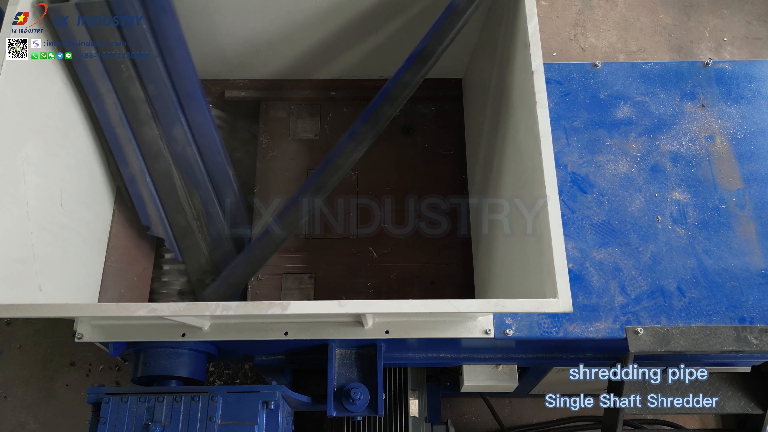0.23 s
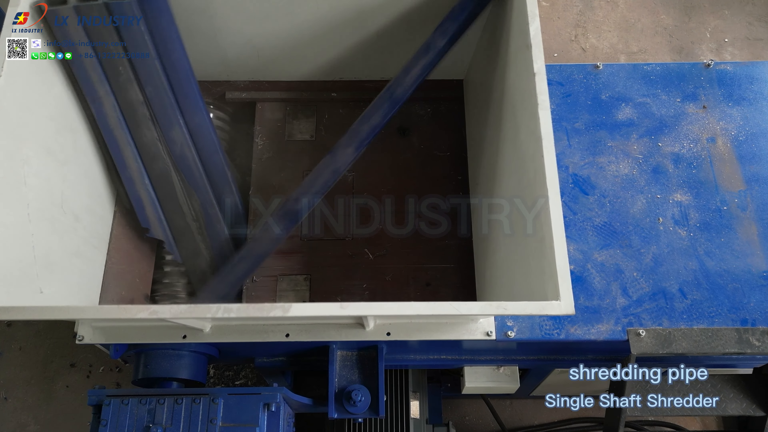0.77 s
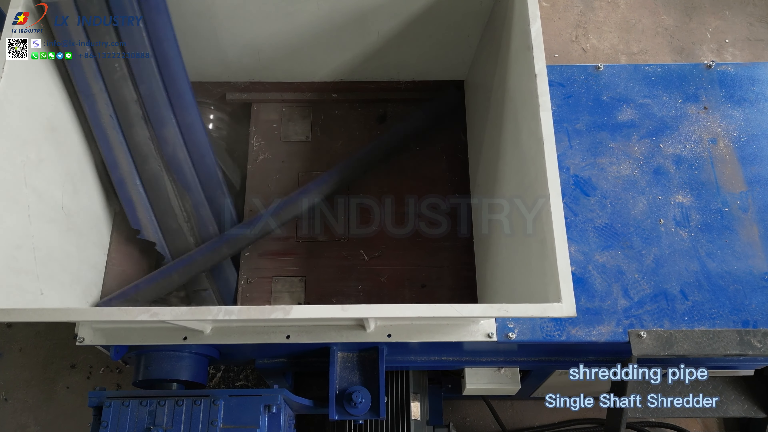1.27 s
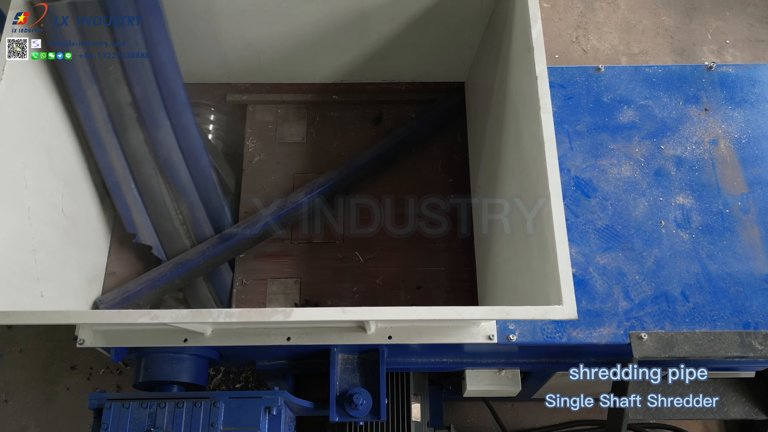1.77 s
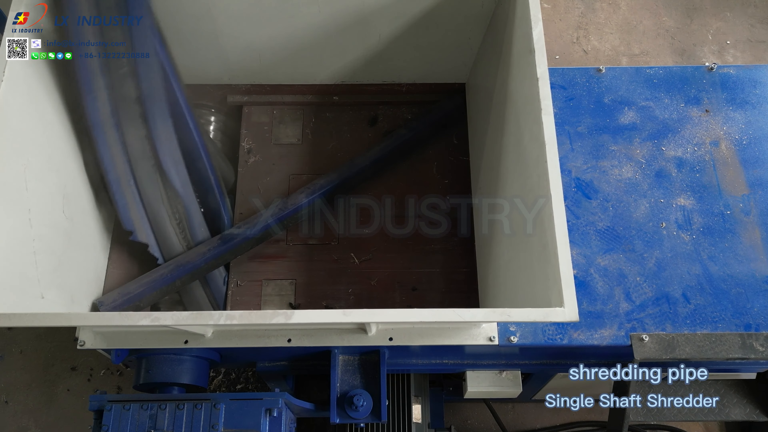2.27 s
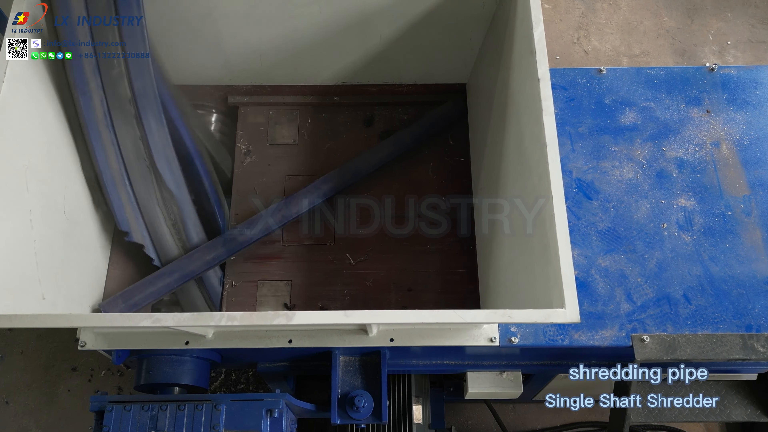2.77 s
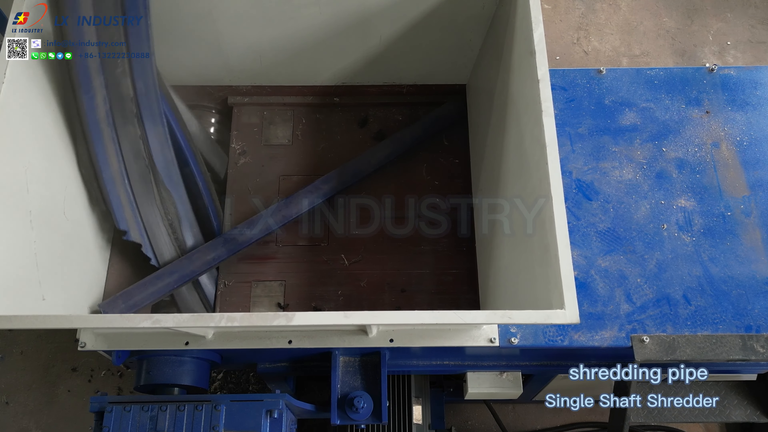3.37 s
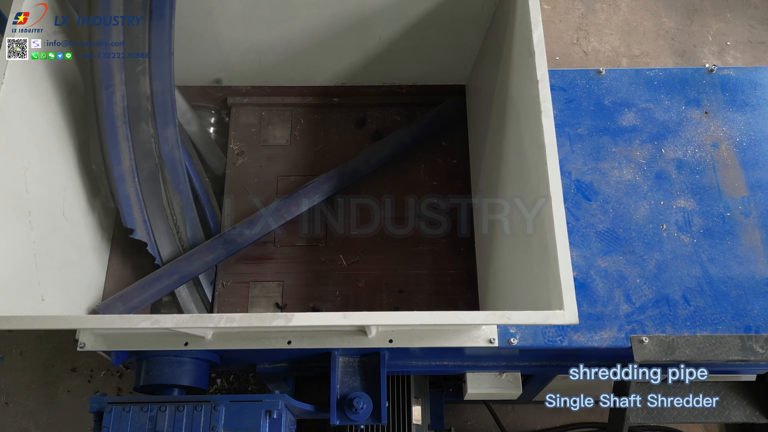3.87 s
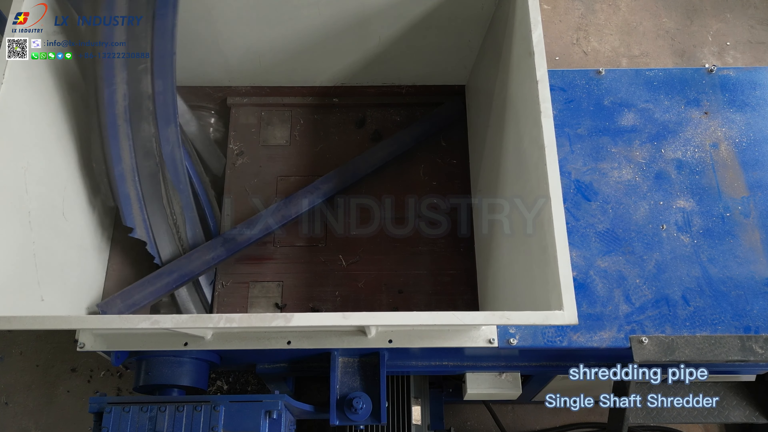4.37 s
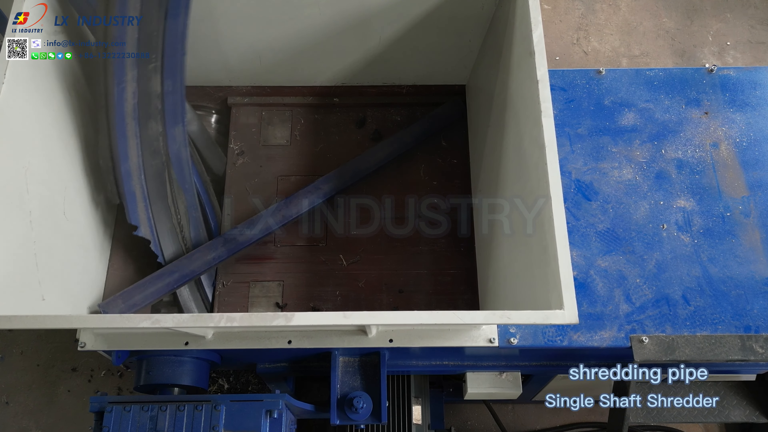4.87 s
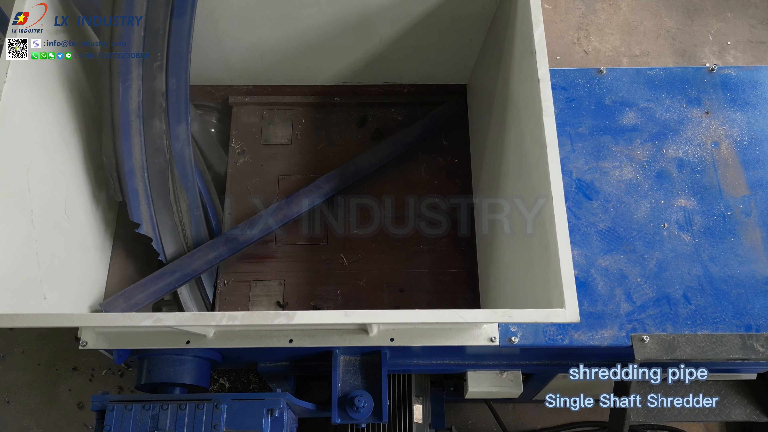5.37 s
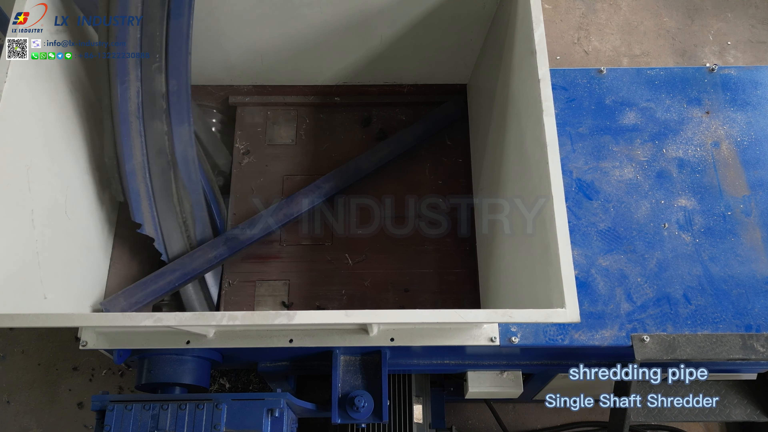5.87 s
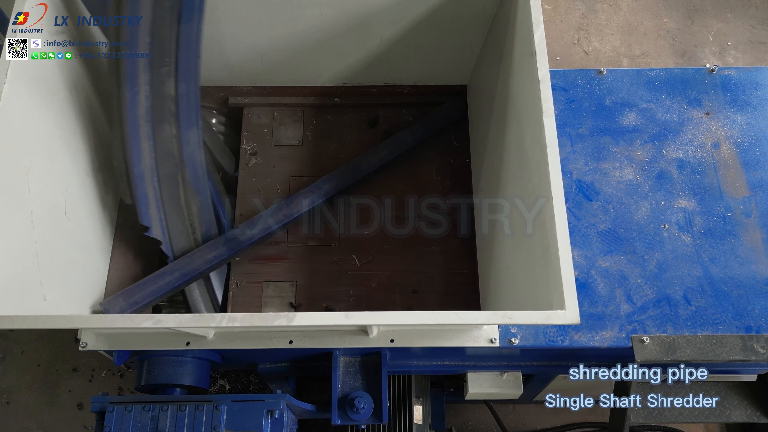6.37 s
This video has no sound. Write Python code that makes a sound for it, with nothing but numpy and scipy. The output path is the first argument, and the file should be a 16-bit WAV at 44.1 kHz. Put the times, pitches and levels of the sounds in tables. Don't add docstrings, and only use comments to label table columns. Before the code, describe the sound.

From 0 s, loud, dense grinding and crunching: shredder knives bite plastic pipe about every 0.17 s, each bite coming fast and dying slowly. Tearing cracks shake the steel hopper into a harsh midrange metallic roar, with snaps, ringing chips, hissing fine spray and low frame rumble. Hollow breathy pipe resonance wavers underneath. From about 2.2 s a pitched honk begins to form; between 3.2 and 4.9 s it is a firm, fluttering tone near 370 Hz, pulsing with every bite while the crunch eases slightly. At about 5 s cutting stops and the level drops sharply. A low steady motor and gear drone shows through, with faint rhythmic scraping, dull knocks of tumbling scraps and tiny clear pings on steel from 5.2 s. Near 6.35-6.55 s louder clustered knocks and a soft low thud with a bounce land before the end at 6.6 s. Close, wide stereo, little audible room.

```python
import sys
import numpy as np
from scipy import signal
from scipy.fft import rfft, irfft, next_fast_len
from scipy.io import wavfile
from scipy.ndimage import uniform_filter1d, map_coordinates

SR = 44100
rng = np.random.default_rng(int(sys.argv[2]) if len(sys.argv) > 2 else 0)


def voltage_ratio(level):
    return 10 ** (np.asarray(level, float) / 20)


def generate_wav(sig):
    pcm = np.round(np.clip(np.atleast_2d(sig).T, -1, 1) * 32767).astype(np.int16)
    wavfile.write(sys.argv[1], SR, pcm)


N = 291501

# (frequency [Hz], density [dB per Hz])
HOPPER = [(120, -0.5), (280, 3.5), (450, 4), (560, 1), (700, 0.5), (1050, 1), (1500, -2.5), (2000, -7),
          (2500, -6.5), (3400, -16), (6000, -29)]
# (frequency [Hz], density [dB per Hz])
SPRAY = [(1500, -2), (2600, 2.5), (3900, -3), (5300, 0), (7000, -6), (9500, -8.5), (11300, -11),
         (12500, -16), (13800, -20), (15000, -13.5), (15400, -19), (16000, -24)]
# (time [s], hold [0-1])
LOCK = [
    (0, .1),
    (2.0, .2),
    (2.3, .55),
    (3.05, .55),
    (3.2, .84),
    (4.85, .84),
    (5.05, .4),
    (5.3, .1),
    (6.61, .1),
]
# (time [s], swell [dB], short pipe re load [dB], long pipe re load [dB])
BITES = [(0.085, -3, -8, -2), (0.28, 3, -5.5, -8), (0.455, 2, -4, -4), (0.625, 3.5, -12, -1),
         (0.8, 2.5, -6, -3), (0.98, 2.5, -18, -8.5), (1.165, 4, -17, -6.5), (1.34, 1, -6.5, -9.5),
         (1.51, 2, -11, -3), (1.69, -1, -5.5, -4), (1.85, .1, -11, -2.5), (2.04, 1.5, -4.5, -3),
         (2.2, 3.5, -3, -2), (2.38, -0.5, 0, -3), (2.56, .5, -1.5, -6), (2.73, 1, -3, -5.5),
         (2.9, 1.5, -0.5, -8.5), (3.08, -1, 1, -3), (3.244, 0.5, 7, -6), (3.42, 2, 9, -10.5),
         (3.601, -0.5, 6.5, -0.5), (3.775, 2.5, 8, -10), (3.955, 0.5, 7, -9), (4.125, 1.5, 7.5, -13),
         (4.305, 1, 4.5, -10), (4.48, 1, 2.5, -13), (4.66, 2.5, 0, -10), (4.835, 0, 4, -5.5),
         (4.98, 3, -4, -9)]
DIRECT = np.array([[1], [0]])


def knives():
    # (frequency [Hz], density [dB per Hz])
    frame_colour = [(25, -64), (45, -11.5), (72, 2.5), (115, -9), (140, -3), (175, -12), (300, -13)]
    # (frequency [Hz], width [Hz], level [dB])
    long_pipe = [(236.7, 23, -6.5), (485.4, 29, -16.5), (694, 240, -18)]
    bite_db, spray_db, frame_db, short_db, long_db = rotor()
    cracks = fractures(rate_hz=200, spread_db=0.5, t60_s=0.035)
    grit = fractures(rate_hz=700, spread_db=2, t60_s=0.014)
    surge = wobble(18)

    walls_db = bite_db - 0.81 + 0.32 * surge + 0.34 * wobble(24.96)
    walls = voltage_ratio(walls_db) * patchy(driven(cracks, 11, sheet_steel), depth_db=0.5)
    ringing = voltage_ratio(bite_db - 11) * chips(count=3500, cycles=11)
    ticks = voltage_ratio(bite_db - 11) * snaps(rate_hz=80)

    spray_db = spray_db + 2 + 0.24 * surge + 0.7 * wobble(55)
    spray = voltage_ratio(spray_db) * patchy(driven(cracks + grit, 14, colour(SPRAY)), depth_db=1.57)
    frame = voltage_ratio(frame_db + 0.8 + 0.11 * wobble(4.3)) * driven(cracks, 8.7, colour(frame_colour))
    short = voltage_ratio(short_db + 0.75) * honk(cracks)
    long = voltage_ratio(long_db + 1) * driven(cracks, 1.1, resonances(long_pipe))
    return walls + ringing + ticks + spray + frame + short + long


def rotor():
    # (time [s], cutting load [dB], frame shake re load [dB], fine chips re load [dB])
    load = [(0.0, -20.5, -3, -9.5), (0.55, -19, -11.5, -9.5), (1.2, -19, -10, -9.5),
            (1.36, -17.5, -7.5, -8), (2.05, -18, -5, -10.5), (2.8, -17, -7, -12), (3.0, -17.5, -11, -12.5),
            (3.5, -19, -9, -13), (4.0, -20.5, -11.5, -13), (4.86, -20, -11.5, -14.5), (5.0, -27, -8, -10),
            (5.12, -32, -0.5, -9), (5.3, -35.5, -6, -11), (6.1, -42.5, -2.5, -7), (6.38, -36.5, -29, -8.5),
            (6.48, -27.5, -13, -15.5), (6.55, -33, -10, -8.5), (6.61, -30.5, -10, -13)]
    # (time [s], swell [dB])
    sweeps = [
        (5.28, 1),
        (5.44, 2),
        (5.63, 2),
        (5.84, 4.5),
        (6.02, 6),
        (6.175, 3),
        (6.355, 4),
        (6.52, 2.5),
    ]
    spray_share, frame_share = 0.74, 0.5
    short_dip_db, chatter_dip_db, long_dip_db = 2.5, 23, 4.5
    freed_s, short_free_db, long_free_db = 0.25, -8, -16

    load_db, shake_db, fine_db = curves(load)
    lock, = curves(LOCK)
    freed = (BITES[-1][0] + freed_s, 0, short_free_db, long_free_db)
    swell_db, short_db, long_db = curves(BITES + [freed])
    gap = beat([row[0] for row in BITES])
    swell_db = swell_db * (0.5 - gap)
    sweep_db = curves(sweeps)[0] * (0.5 - beat([row[0] for row in sweeps]))

    bite_db = load_db + swell_db + sweep_db
    spray_db = load_db + fine_db + spray_share * swell_db + sweep_db
    frame_db = load_db + shake_db + frame_share * swell_db
    short_db = load_db + short_db - (short_dip_db + chatter_dip_db * lock ** 3) * gap
    long_db = load_db + long_db - long_dip_db * gap
    return bite_db, spray_db, frame_db, short_db, long_db


def beat(times):
    row_s, linger = 0.15, 0.09
    t = np.arange(N) / SR
    start, end = times[0] - row_s / 2, times[-1] + row_s / 2
    turn = np.interp(t, [start] + times + [end], np.r_[-0.5, 0:len(times), len(times) - 0.5])
    turn = turn - linger * np.sin(np.pi * turn) ** 2
    gap = np.where((t > start) & (t < end), np.sin(np.pi * turn) ** 2, 0.5)
    return uniform_filter1d(gap, size=400)


def fractures(rate_hz, spread_db, t60_s):
    draw = rng.random((2, N))
    size_db = spread_db * np.minimum(-np.log(1 - draw[1]), 3)
    cracks = (draw[0] < rate_hz / SR) * voltage_ratio(2 * size_db)
    power = signal.lfilter([1], [1, -voltage_ratio(-120 / (t60_s * SR))], cracks)
    power = abs(uniform_filter1d(power, size=130))
    return power / power.mean()


def driven(power, steady, response):
    force = np.sqrt(power + steady) * rng.standard_normal((2, N))
    return unit(filtered(force, response))


def patchy(x, depth_db):
    z = signal.stft(x, nperseg=512)[2]
    field = uniform_filter1d(rng.standard_normal(z.shape[1:]), size=3, axis=0)
    field = uniform_filter1d(field, size=5, axis=1)
    return unit(signal.istft(z * voltage_ratio(depth_db * unit(field)), nperseg=512)[1][:, :N])


def sheet_steel(f):
    # (frequency [Hz], width [Hz], level over the walls [dB], sign ignored)
    panels = [(325, 22, -1.5), (344, 8.8, 8), (410, 21, 3.5), (452, 6.7, -6.5), (517, 5.8, 3.5),
              (660, 35, 4.5), (671, 22, 1), (913, 10.6, 8.5), (997, 9.8, 8), (1080, 7.6, 9), (1218, 21, 5),
              (1465, 38, 3.5), (1714, 12, 7), (2550, 22, 4.5)]
    modes = sum((voltage_ratio(2 * abs(db)) - 1) / (1 + (2 * (f - hz) / width) ** 2) for hz, width, db in panels)
    return colour(HOPPER)(f) * np.sqrt(1 + modes)


def chips(count, cycles):
    draw, t = rng.random((count, 4)), np.arange(640) / SR
    hz = 700 * (7000 / 700) ** draw[:, 1:2]
    rise = t * hz / np.minimum(cycles, hz * t[-1] / 5)
    size = voltage_ratio(along(HOPPER, hz).clip(-24) + 11 * draw[:, 2:3] ** 2)
    ring = size * rise * np.exp(-rise) * np.sin(2 * np.pi * hz * t)
    length = N + len(t)
    at = (draw[:, :1] * N).astype(int) + np.arange(len(t))
    at = at + (draw[:, 3:] < 0.25) * length
    return unit(np.bincount(at.ravel(), ring.ravel(), 2 * length).reshape(2, -1)[:, :N])


def snaps(rate_hz):
    draw = rng.random((3, 2, N))
    ticks = (draw[0] < rate_hz / SR) * voltage_ratio(3.9 * draw[1]) * np.sign(draw[2] - 0.5)
    return unit(filtered(ticks, lambda hz: colour(HOPPER)(hz) + voltage_ratio(-16) * colour(SPRAY)(hz)))


def honk(cracks):
    # (frequency [Hz], strength)
    short_pipe = [
        (374, 0.85),
        (752, 0.21),
        (1128, 0.077),
    ]
    # (frequency [Hz], width [Hz], level [dB])
    pipe_air = [(314, 16, -0.5), (345.4, 3.5, 2), (393.5, 27, 0), (752, 68, -10), (1130, 30, -6)]
    climb, early_db = 0.006, 5
    lock, = curves(LOCK)
    bite = np.interp(np.arange(N) / SR, [row[0] for row in BITES], range(len(BITES)))
    late = np.sin(2 * np.pi * bite)
    turns = np.cumsum(1 + climb * late + 0.1 * (1 - lock) * wobble(30)) / SR
    tone = 0
    for k, (hz, strength) in enumerate(short_pipe):
        flutter_db = 2 * wobble(60)
        fade_db = -early_db * late * (k > 0)
        tone = tone + strength * voltage_ratio(flutter_db + fade_db) * np.sin(2 * np.pi * hz * turns)
    breath = driven(cracks, 1.4, resonances(pipe_air))
    return np.sqrt(lock) * unit(tone) * DIRECT + np.sqrt(1 - lock) * breath


def knocks():
    # (time [s], peak [dB], ring [Hz], snap re peak [dB])
    tumbles = [(5.239, -29, 398, -10), (5.272, -17, 520, -15), (5.578, -19, 392, -18),
               (5.618, -21, 1060, -16), (5.65, -21, 415, -15), (5.819, -26, 452, -10), (5.9, -27, 458, -11),
               (5.983, -19, 430, -22), (6.069, -28, 514, -9), (6.159, -21, 380, -13), (6.26, -33, 536, -6),
               (6.349, -19, 430, -9), (6.409, -21, 440, -15), (6.441, -15, 680, -27),
               (6.468, -11.5, 1090, -30), (6.509, -12.5, 1050, -23)]
    out, t = np.zeros((2, N + SR)), np.arange(SR // 8) / SR
    bright = signal.butter(1, [900, 6000], "bandpass", fs=SR)
    for s, db, hz, snap_db in tumbles:
        dull = signal.butter(1, [hz / 1.11, hz * 1.02], "bandpass", fs=SR)
        noise = rng.standard_normal((2, 2, len(t)))
        ring = unit(signal.lfilter(*dull, noise[0])) * voltage_ratio(-60 * t / 0.12)
        snap = unit(signal.lfilter(*bright, noise[1])) * voltage_ratio(snap_db + 9 - 60 * t / 0.06)
        attack = 1 - np.exp(-t / 0.0012)
        out[:, round(s * SR):][:, :len(t)] += voltage_ratio(db - 11.5) * (ring + snap) * attack
    return out[:, :N]


def pings():
    # (time [s], peak [dB], frequency [Hz])
    strikes = [
        (5.241, -35, 3400),
        (5.409, -29, 2610),
        (5.579, -34, 3300),
        (6.261, -31, 3200),
        (6.318, -39, 5100),
        (6.352, -34, 4830),
        (6.352, -32, 2630),
    ]
    out, t = np.zeros(N + SR), np.arange(SR // 20) / SR
    for s, db, hz in strikes:
        size = voltage_ratio(db - 3 - 60 * t / 0.035) * (1 - np.exp(-t / 0.0017))
        out[round(s * SR):][:len(t)] += size * np.sin(2 * np.pi * hz * t)
    return out[:N]


def thuds():
    # (time [s], peak [dB])
    drops = [
        (6.49, -27.5),
        (6.544, -32),
    ]
    ring_hz, t60_s, attack_s = 73, 0.12, 0.0088
    s, db = np.transpose(drops)[:, :, None]
    t = np.maximum(np.arange(N) / SR - s, 0)
    size = 3 * voltage_ratio(db - 60 * t / t60_s) * (1 - np.exp(-t / attack_s))
    return (size * np.sin(2 * np.pi * ring_hz * t)).sum(axis=0)


def drive():
    # (frequency [Hz], density [dB per Hz])
    drone = [(60, 1), (85, -9), (135, -5.5), (175, -4), (232, 8), (285, -32), (400, 1), (540, 0.5),
             (720, -12), (1100, -7), (1500, -20), (1700, -8), (2150, -21), (2600, -25.5)]
    # (frequency [Hz], level [dB])
    gears = [(80.7, -45), (231.5, -46), (473.7, -46), (538.3, -52), (1082, -52), (1190, -63), (1712, -68),
             (2433, -72)]
    t = np.arange(N) / SR
    tones = 0
    for hz, db in gears:
        size = voltage_ratio(db - 2 + 2.9 * wobble(6.1))
        tones = tones + size * np.sin(2 * np.pi * hz * t + 0.18 * wobble(3.9))
    return voltage_ratio(-41 + 0.75 * wobble(17)) * driven(0, 1, colour(drone)) + tones * DIRECT


def ports(pair):
    # (frequency [Hz], share)
    alike = [(60, .997), (200, .97), (350, .93), (700, .78), (1900, .64), (2700, .76), (4100, .3),
             (5500, .03), (6900, .45), (8800, .66), (9800, .96), (10300, .96), (11100, .62), (13000, .92),
             (14300, .92), (15500, .4)]
    # (frequency [Hz], lead [rad])
    lead = [(0, 0), (1000, .3), (1750, -.15), (3500, 1.2), (5200, 1.2), (5800, -1.5), (6800, -.15),
            (8300, -1.1), (9700, -3.05), (10300, -3.2), (12000, -5.1), (12800, -6.28), (14200, -6.35),
            (15500, -8.9)]
    # (frequency [Hz], left re right [dB])
    lean = [(100, 0), (380, -.9), (1100, 1.4), (2500, -.4), (4200, .2), (5500, 4), (7300, 1.3), (8500, 1.2),
            (9600, 0)]
    side = np.array([[0.5], [-0.5]])

    def mix(hz):
        turn = np.arccos(np.clip(along(alike, hz), 0, 1)) / 2
        return np.array([np.cos(turn), np.sin(turn)])

    def port(hz):
        phase = np.interp(hz, *np.transpose(lead))
        return voltage_ratio(side * along(lean, hz)) * np.exp(1j * side * phase)

    common, apart = filtered(pair, mix)
    return filtered(np.array([common + apart, common - apart]), port)


def unit(x):
    return x / np.sqrt(np.mean(x ** 2) + 1e-20)


def along(points, hz):
    f, v = np.transpose(points)
    return np.interp(np.log(hz + 1), np.log(f + 1), v)


def curves(rows):
    s, *cols = np.transpose(rows)
    return [np.interp(np.arange(N) / SR, s, c) for c in cols]


def wobble(rate_hz):
    knots = rng.standard_normal(int(N * rate_hz / SR) + 4)
    return map_coordinates(knots, [np.arange(N) * rate_hz / SR])


def filtered(x, response):
    m = next_fast_len(N + 8192)
    return irfft(rfft(x, m) * response(np.fft.rfftfreq(m, 1 / SR)), m)[..., :N]


def colour(points):
    return lambda hz: voltage_ratio(along([(1, -120)] + points + [(SR / 2, -90)], hz))


def resonances(modes):
    def response(f):
        total = 0
        for k, (hz, width, db) in enumerate(modes):
            damping = 1j * f * width
            total = total + (-1) ** k * voltage_ratio(db) * damping / (hz * hz - f * f + damping)
        return total
    return response


def scene():
    return ports(knives() + knocks() + (pings() + thuds()) * DIRECT + drive())


def band_limit(x):
    return signal.sosfilt(signal.butter(12, 15640, fs=SR, output="sos"), x)


def record(dry):
    limited = dry / (1 + abs(dry / 1.2) ** 4) ** (1 / 4)
    return band_limit(limited)


dry = scene()
out = record(dry)
generate_wav(out)
```